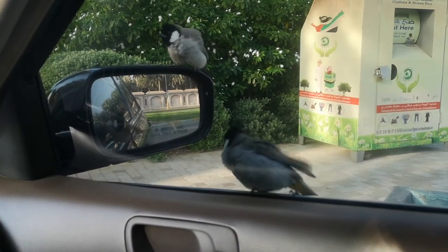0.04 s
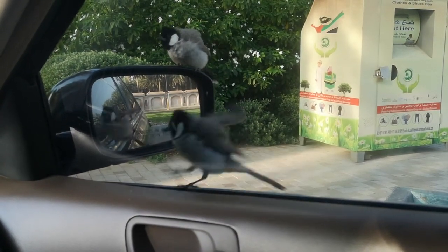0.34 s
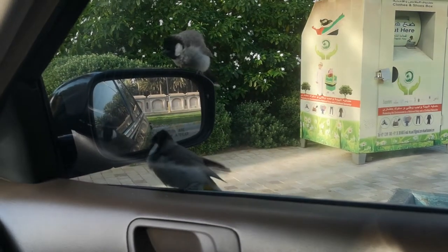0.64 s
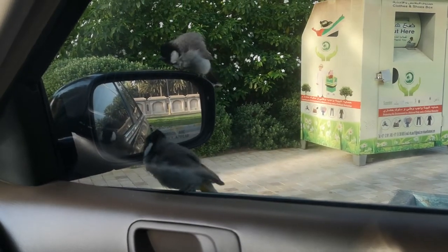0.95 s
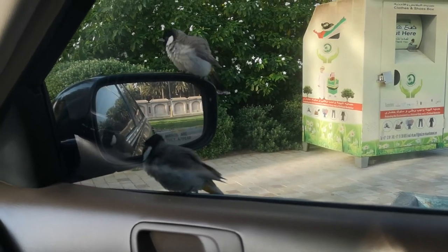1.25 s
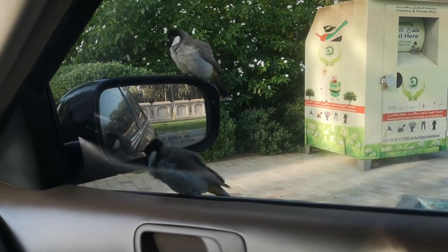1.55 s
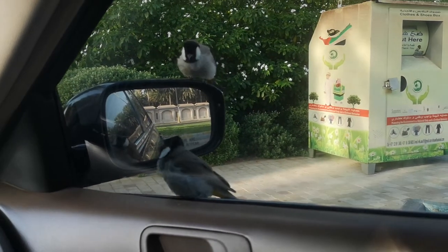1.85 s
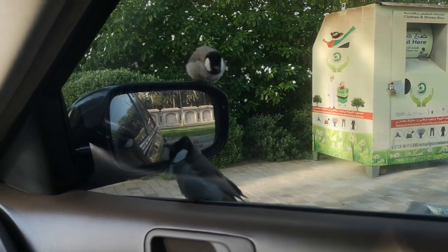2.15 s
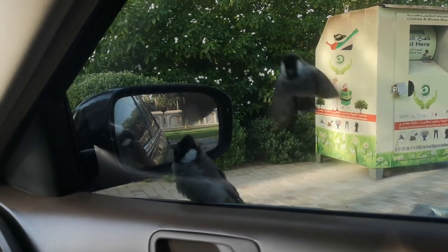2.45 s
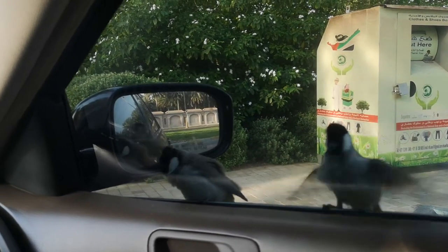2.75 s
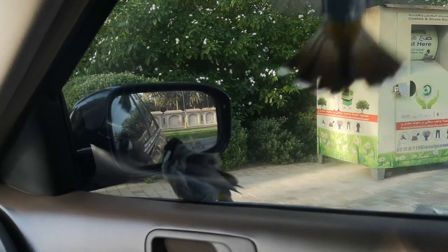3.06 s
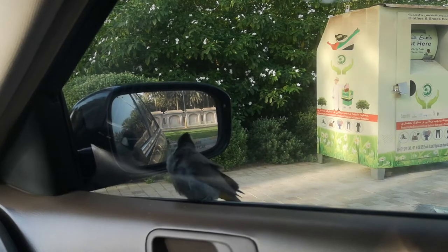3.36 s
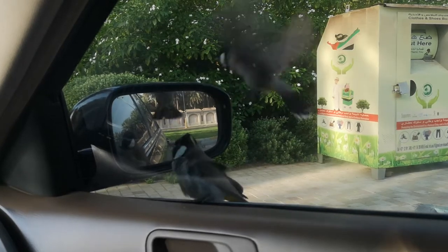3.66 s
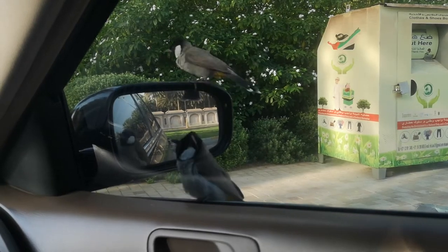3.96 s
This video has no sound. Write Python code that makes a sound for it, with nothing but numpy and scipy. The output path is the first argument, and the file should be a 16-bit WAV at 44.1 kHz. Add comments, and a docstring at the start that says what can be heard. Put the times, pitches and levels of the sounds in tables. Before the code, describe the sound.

A bird knocks sharply on a closed car window at about 2.9 seconds, heard from inside. Before that, small birds chirp faintly outside, with light scuffs on the glass around 0.5 seconds. The knock thuds in the door and is followed by quick claw scratches, smaller taps and soft bumps until about 3.2 seconds. A quiet, low engine hum and traffic rumble run underneath to the end at 4 seconds.

```python
"""Bird at the car window

Inside a parked car, two small birds chatter just beyond the closed side window; others whistle far off.
One flies at the pane, knocks, scrabbles with its claws and brushes it once more. Each hard blow ticks,
rings the glass, thuds in the door and booms in the cabin. An engine hums and traffic rumbles beneath."""
import sys
import numpy as np
from scipy import signal
from scipy.fft import rfft, irfft
from scipy.io import wavfile

SR = 44100
rng = np.random.default_rng(int(sys.argv[2]) if len(sys.argv) > 2 else 0)


def int16_out(signal):
    """Quantize to a 16-bit WAV file."""
    q = np.round(np.clip(np.atleast_2d(signal).T, -1, 1) * 32767)
    wavfile.write(sys.argv[1], SR, q.astype(np.int16))


N = 176400
TIME = np.arange(N) / SR
CUTOFF_HZ = 15900


def amp(db):
    """Decibels to gain."""
    return 10 ** (np.asarray(db) / 20)


def curve(rows):
    """An automation line through (t/s, value) points."""
    return np.interp(TIME, *np.transpose(rows))


def at_hz(rows, hz):
    """Read a table's columns along a log frequency axis."""
    f, *columns = np.transpose(rows)
    return [np.interp(np.log(hz), np.log(f), c) for c in columns]


def add(out, s, x):
    """Mix a sound in at s seconds."""
    i = max(int(s * SR), 0)
    out[..., i:i + x.shape[-1]] += x[..., :N - i]


def band_noise(low, high, size):
    """Two unrelated noises in one band, rms 1."""
    sos = signal.butter(2, [low, high], "band", fs=SR, output="sos")
    noise = signal.sosfilt(sos, rng.standard_normal((2, size + SR // 10)))[:, -size:]
    return noise / np.sqrt(np.mean(noise ** 2) + 1e-20)


def noise_bed(levels, hz, width_hz):
    """A stereo band of noise riding a level curve."""
    return amp(curve(levels)) * band_noise(hz - width_hz / 2, hz + width_hz / 2, N)


def ring(drive, hz, db, t60):
    """One resonant mode, rung by the drive signal."""
    r, w = amp(-60 / (t60 * SR)), 2 * np.pi * hz / SR
    return amp(db) * signal.lfilter([0, np.sin(w)], [1, -2 * r * np.cos(w), r * r], drive + 1e-18)


def ring_modes(drive, modes):
    """A bank of modes in alternating polarity."""
    return sum((-1) ** k * ring(drive, *mode) for k, mode in enumerate(modes))


def decay(t, t60):
    """Exponential fade, 60 dB down at t60."""
    return np.exp(-np.log(1000) * t / t60)


def note(pitch, colour, attack_s, release_s, harmonics, side_db=0, bite_db=0):
    """A bird's note: side_db trims all harmonics but the second, bite_db lifts those above it."""
    t, phase = TIME[:len(pitch)], 2 * np.pi * np.cumsum(pitch) / SR
    tone = 0
    for k in range(1, harmonics + 1):
        db = at_hz(colour, k * pitch)[0] + side_db * (k != 2) + bite_db * (k > 2)
        tone += amp(db) * np.sin(k * phase)
    return np.sqrt(2) * tone * np.minimum(t / attack_s, 1) * np.minimum((t[-1] - t) / release_s, 1)


# Outdoor bed: f/Hz, level/dB in a 1 kHz band, left-right correlation
AMBIENCE = [(25.7, -48.5, 1), (47.2, -38, 0.99), (80, -55.5, 1), (120, -58.5, 0.93), (170, -62.5, 0.87),
            (270, -74.5, 0.29), (455, -77.5, -0.5), (840, -80, -0.28), (1380, -78.5, 0.3),
            (2570, -79.5, -0.34), (4150, -86, -0.18), (6930, -88.5, -0.24), (11350, -99, 0.53),
            (15400, -99, 0.03)]

def ambience():
    """Steady muffled rumble in the centre, with a faint, wide hiss."""
    hz = np.maximum(np.fft.rfftfreq(N, 1 / SR), 1)
    db, alike = at_hz(AMBIENCE, hz)
    mid, side = rfft(rng.standard_normal((2, N))) * amp(db) * np.sqrt(SR / 4000) * (hz > 12)
    return irfft(np.sqrt(1 + alike) * mid + np.sqrt(1 - alike) * side * [[1], [-1]], N)


# Faders of the low drone and the rumble above it: t/s, level/dB
DRONE_LEVEL = [(0, -64.5), (1.15, -60), (2.2, -65.5), (3.7, -59)]
RUMBLE_LEVEL = [(0, -70), (.45, -70.5), (.9, -75.5), (1.5, -83.5), (3.5, -83.5), (4, -71)]

def traffic():
    """Traffic as a rough drone and a higher rumble, both mono."""
    drone = noise_bed(DRONE_LEVEL, hz=79, width_hz=21.5)[0]
    rumble = noise_bed(RUMBLE_LEVEL, hz=164.7, width_hz=57)[0]
    return drone + rumble


# Engine firing rate: t/s, f/Hz
FIRING_RATE = [(0, 87.6), (1, 93), (1.6, 72.1), (2.2, 54), (2.47, 49.38), (2.72, 56.02), (4, 58.2)]
# Engine fader: t/s, level/dB
ENGINE_LEVEL = [(0, -66.5), (.3, -58), (.7, -63), (1.15, -54.5), (1.6, -59.5), (2.08, -59.5), (2.2, -46.5),
                (2.38, -48.5), (2.58, -52.5), (2.86, -52), (3.0, -43.5), (3.11, -42.5), (3.2, -51.5),
                (3.32, -57), (3.38, -45.5), (3.66, -44.5), (3.82, -57.5), (4, -49)]

def engine(octave_db=-21.5):
    """An engine eases off and settles: its hum drops in pitch and swells unevenly."""
    phase = 2 * np.pi * np.cumsum(curve(FIRING_RATE)) / SR
    tone = np.sqrt(2) * (np.sin(phase) + amp(octave_db) * np.sin(2 * phase))
    return amp(curve(ENGINE_LEVEL)) * tone


def whine(hz=590, db=-87.5, peak_s=2.39, swell_s=.21):
    """A thin whine comes and goes."""
    swell = np.exp(-((TIME - peak_s) / swell_s) ** 2)
    return amp(db) * swell * np.sqrt(2) * np.sin(2 * np.pi * hz * TIME)


# Fader of the distant chatter: t/s, level/dB
CHATTER_LEVEL = [(0, -77), (.4, -78), (.62, -72.5), (.9, -77), (1.3, -92), (2.4, -78), (4, -81)]
CHATTER_HZ, CHATTER_WIDTH_HZ = 2355, 1440

def far_chatter():
    """Distant birds blur into a wide wash of noise."""
    return noise_bed(CHATTER_LEVEL, CHATTER_HZ, CHATTER_WIDTH_HZ)


def far_pips(per_s=12, db=-86, length_s=.035, max_glide=.12):
    """Faint gliding bird pips, scattered across the chatter's band."""
    out, u = np.zeros(N), np.linspace(-.5, .5, int(length_s * SR))
    envelope = amp(db) * np.sqrt(2) * np.cos(np.pi * u)
    for when, height, slope in rng.random((int(per_s * N / SR), 3)):
        hz = CHATTER_HZ + CHATTER_WIDTH_HZ * (height - .5)
        pitch = hz * (1 + max_glide * (2 * slope - 1) * u)
        add(out, when * N / SR, envelope * np.sin(2 * np.pi * np.cumsum(pitch) / SR))
    return out


# Whistle cues: t/s, length/s, f/Hz, level/dB, glide/share of f, fundamental trim/dB
WHISTLES = [(0.413, 0.034, 1303, -72, 0.043, 3.5), (0.545, 0.067, 1254, -75.5, -0.16, -10),
            (1.805, .037, 1277, -76.5, -0.04, -1.5), (1.884, 0.034, 1344, -77.5, -0.1, 1.5),
            (2.169, 0.039, 1287, -77, 0.015, 0.5), (3.853, 0.037, 1215, -74, 0.12, -6)]
# Whistle EQ: f/Hz, gain/dB
WHISTLE_EQ = [(1250, 2), (2600, 2.5)]

def far_whistles():
    """Birds further off whistle short glides, each a fundamental and its octave."""
    out = np.zeros(N)
    for s, length, hz, db, glide, trim_db in WHISTLES:
        pitch = hz * (1 + glide * np.linspace(-.5, .5, int(length * SR)))
        whistle = note(pitch, WHISTLE_EQ, attack_s=.019, release_s=.02, harmonics=2, side_db=trim_db)
        add(out, s, amp(db) * whistle)
    return out


# Chirp cues: t/s, length/s, top f/Hz, level/dB, rise/share of f, fall/share of f, rasp/0-1
CHIRPS = [(0.06, 0.017, 1880, -74.5, 0.22, 0.052, 0.3), (0.229, 0.012, 1623, -67.5, 0.058, 0.087, 0.8),
          (0.301, 0.019, 1766, -74.5, 0.26, .03, 0.5), (0.509, 0.016, 1734, -73.5, 0.1, .05, 1),
          (0.605, 0.018, 1870, -61.5, 0.066, 0.024, 0.74), (0.67, 0.042, 2004, -66, 0.14, 0.23, 0.4),
          (0.773, 0.016, 1837, -73, 0.143, .03, 0.72), (0.873, 0.017, 1930, -64, 0.022, .03, 0.8),
          (0.94, 0.042, 2110, -66.5, 0.2, 0.29, 0.3), (1.06, 0.021, 1713, -73.5, 0.059, 0.11, 0.92),
          (1.16, 0.02, 1867, -66, 0.074, 0.039, 1), (1.236, 0.042, 2099, -68, 0.18, 0.28, 0.4),
          (1.575, 0.016, 1590, -73.5, 0.047, .08, 0.72), (1.675, 0.02, 1808, -67, 0.042, 0.037, 1),
          (1.758, 0.048, 2108, -69, 0.21, 0.27, 0.25), (2.363, 0.016, 1780, -60, 0.016, 0.047, 0.53),
          (2.382, 0.033, 2010, -57, 0.286, 0.1525, 0.06), (2.472, 0.019, 1747, -64, 0.091, 0.047, 0.4),
          (2.604, 0.02, 1763, -68, 0.057, .05, 0.9), (2.626, 0.032, 2030, -60.5, 0.34, 0.21, 0.09),
          (2.71, 0.03, 1720, -67.5, 0.2, 0.043, 0.6), (2.849, 0.027, 1845, -69.5, 0.026, .05, .7),
          (2.872, 0.028, 1897, -62, 0.17, 0.15, 0.55), (2.96, 0.023, 1730, -57, 0.034, 0.064, 0.95)]
# Delivery, reedy and even at first, at last purer, quicker and leaning on each note's end:
# t/s, side harmonics/dB, swell/dB per s, time stretch of the arch
DELIVERY = [(.3, -3, -6, 0.96), (1.2, 0, -65, 1), (1.8, -1, -57, 0.91), (2.35, -7, 174, .66)]
# EQ of the calls behind the glass: f/Hz, gain/dB
CHIRP_EQ = [(1600, -9), (2050, -7.5), (3300, 0.5), (3650, -1.5), (4200, -5), (5000, -17.5), (5600, -12),
            (6300, -15), (7200, -30.5), (8400, -19)]
# Cabin resonances that trail each call: f/Hz, level/dB, t60/s
CALL_RINGS = [(3062, -46.5, 0.081), (3750, -51, 0.15), (4140, -45, .1), (5046, -41.5, 0.089),
              (6690, -42.5, 0.12)]
ARCH_TOP_S, ARCH_RISE_S, ARCH_FALL_S = .017, .013, .009   # before the stretch
RASP_HZ, RASP_PITCH_DEPTH, RASP_LEVEL_DEPTH, RASP_BITE_DB = 360, .11, .45, 5

def near_birds():
    """Close chirps arch in pitch; rasp shakes and brightens them, and the cabin rings on."""
    out = np.zeros(N)
    shake, flutter = band_noise(RASP_HZ / 2, RASP_HZ * 2, N)
    when, *manner = np.transpose(DELIVERY)
    for s, length, hz, db, rise, fall, rasp in CHIRPS:
        side_db, swell_db, stretch = (np.interp(s, when, m) for m in manner)
        t = TIME[:int(length * SR)] - ARCH_TOP_S * stretch   # zero at the top of the arch
        here = int(s * SR) + np.arange(len(t))
        slope_s = stretch * np.where(t < 0, ARCH_RISE_S, ARCH_FALL_S)
        sag = np.where(t < 0, rise, fall) * (1 - np.exp(-(t / slope_s) ** 2))
        pitch = hz * np.maximum(1 - sag + RASP_PITCH_DEPTH * rasp * shake[here], .5)
        gain = amp(db + swell_db * t) * (1 + RASP_LEVEL_DEPTH * rasp * flutter[here])
        chirp = note(pitch, CHIRP_EQ, attack_s=.005, release_s=.006, harmonics=4,
                     side_db=side_db, bite_db=RASP_BITE_DB * rasp ** 2)
        add(out, s, gain * chirp)
    return out + ring_modes(out, CALL_RINGS)


def cabin(x, t60=.075, wet_db=-3):
    """Direct sound plus the short, dense reverb of an upholstered cabin."""
    t = TIME[:SR // 5]
    echo = rng.standard_normal((2, len(t))) * decay(t, t60)
    echo /= np.sqrt(np.sum(echo ** 2, axis=1, keepdims=True))
    return x + amp(wet_db) * signal.fftconvolve(x[None], echo, axes=1)[:, :N]


# Soft body hits: t/s, f/Hz, level/dB, t60/s
BUMPS = [(3.027, 128, -41, .08), (3.135, 238.5, -41, 0.1), (3.165, 123, -36.5, .07)]

def bumps():
    """Wings and breast meet the pane with a dull thud and no tick."""
    out, t = np.zeros(N), TIME[:SR // 4]
    for s, hz, db, t60 in BUMPS:
        add(out, s, amp(db) * np.sin(2 * np.pi * hz * t) * decay(t, t60))
    return out


# Dense tail of pane and cabin: f/Hz, level/dB in a 1 kHz band, t60/s, left minus right/dB
TICK_TAIL = [(200, -36, 0.16, 7), (490, -40, 0.081, -4.5), (990, -34.5, 0.06, -1), (1410, -49, 0.088, -0.5),
             (1930, -36, 0.087, -1), (2300, -41, 0.084, 0.5), (4800, -42, 0.059, -5), (6400, -50, 0.071, 2),
             (8490, -42, 0.043, -10.5), (12000, -66, 0.032, -12), (15600, -63, 0.042, -2)]
CRACK_DB, CRACK_S, CRACK_CORNER_HZ = 10, .00067, 15000
CENTRED_BELOW_HZ = 670

def tick(tilt_db):
    """A hard point touches the pane: a bright crack, then a dense ring that dies band by band."""
    t, out = TIME[:SR // 5], 0
    edges = np.geomspace(140, CUTOFF_HZ, 23)
    for low, high in zip(edges, edges[1:]):
        hz, width_khz = np.sqrt(low * high), (high - low) / 1000
        db, t60, pan_db = at_hz(TICK_TAIL, hz)
        stereo_db = db + tilt_db * np.log2(hz / 5000) + pan_db * np.array([[.5], [-.5]])
        crack = amp(CRACK_DB) * np.exp(-t / CRACK_S) / (1 + (CRACK_CORNER_HZ / hz) ** 2)
        mid, side = band_noise(low, high, len(t))
        alike = 1 / (1 + (hz / CENTRED_BELOW_HZ) ** 2)
        noise = np.sqrt((1 + alike) / 2) * mid + np.sqrt((1 - alike) / 2) * side * [[1], [-1]]
        out += np.sqrt(width_khz) * amp(stereo_db) * noise * (decay(t, t60) + crack)
    return out


# Scuff cues: t/s, length/s, level/dB, tilt/dB per octave
SCUFFS = [(0.4, 0.0073, -37.5, 2.5), (0.478, 0.018, -36, 1.5), (0.526, 0.023, -31, 3.5),
          (2.26, 0.015, -37, -2), (2.878, 0.033, -24.5, 0.5), (2.989, 0.036, -19, 1.5),
          (3.106, 0.031, -25.5, -1), (3.133, 0.046, -12, -0.5), (3.796, 0.021, -37.5, -3.5)]

def scuffs(grains_per_s=390, fade_db=13):
    """Claws and feathers rub the glass in fading runs of tiny, uneven ticks."""
    out = np.zeros((2, N))
    for s, length, db, tilt_db in SCUFFS:
        u = np.linspace(0, 1, int(length * SR))
        chance, size = rng.random(SR // 10)[:len(u)], rng.standard_normal(SR // 10)[:len(u)]
        catches = (chance < grains_per_s / SR) | (u == 0)
        grains = size * catches * amp(-fade_db * u)
        grains /= np.linalg.norm(grains)
        add(out, s, amp(db) * signal.fftconvolve(grains[None], tick(tilt_db), axes=1))
    return out


# Hard hits: t/s, tick/dB, tick tilt/dB per octave, glass ring/dB, door thud/dB, cabin boom/dB
BLOWS = [(2.864, -18.5, 5, -48, -30, -16), (2.9055, 3.5, 3, 1.5, 4.5, -9), (2.9103, -10, -4, -15, -13, -31),
         (2.9696, -18.5, 2.5, -50, -16, -38), (2.976, -25, -2, -49, -17, -0.5),
         (2.9858, -15, 10.5, -31.5, -14.5, -11), (3.001, -27, 10, -49, -27, -30),
         (3.1231, -16.5, 7, -36, -43, -14), (3.1337, -13, 2.5, -24, -12, -30),
         (3.192, -28, 0.5, -57, -33.5, -38)]
# Pane modes: f/Hz, level/dB, t60/s, right gain against left (negative flips polarity)
GLASS_MODES = [(309.2, -30, 0.14, 0.42), (400, -45, .1, -1.1), (552, -40, 0.11, -1.4),
               (611, -43, 0.12, 0.88), (715, -37.5, 0.13, -0.94), (807, -39, 0.12, 0.19),
               (917, -27, 0.059, 0.25), (996, -36, 0.089, -0.17), (1108, -29, 0.017, 0.87),
               (2480, -52, 0.12, 0.81), (2740, -47, 0.085, 0.86), (3920, -39.5, 0.037, 0.82),
               (5064, -34.5, 0.03, 1)]
# Door modes: f/Hz, level/dB, t60/s
DOOR_MODES = [(160.7, -24.5, 0.059), (100.3, -27, 0.18), (200, -34.5, 0.038)]
SOFT_CONTACT_HZ = 553

def knocks():
    """Each blow of the bird ticks, rings the glass, thuds in the door and sets the cabin air booming."""
    ticks = np.zeros((2, N))
    glass_hits, door_hits, air_hits = np.zeros((3, N))
    for s, tick_db, tilt_db, glass_db, door_db, boom_db in BLOWS:
        add(ticks, s, amp(tick_db) * tick(tilt_db))
        i = int(s * SR)
        glass_hits[i], door_hits[i], air_hits[i] = amp([glass_db, door_db, boom_db])
    thud = ring_modes(door_hits, DOOR_MODES)
    boom = ring(air_hits, hz=54, db=-28, t60=.18)
    low_end = signal.sosfilt(signal.butter(2, SOFT_CONTACT_HZ, fs=SR, output="sos"), thud + boom)
    pane = sum((-1) ** k * ring(glass_hits, *mode) * np.array([[1], [right]])
               for k, (*mode, right) in enumerate(GLASS_MODES))
    return ticks + low_end + pane


def scene():
    """The mix from the seat: bird calls, hits on the window and the bed beneath."""
    calls = cabin(near_birds() + far_whistles() + far_pips())
    window = knocks() + bumps() + scuffs()
    bed = engine() + whine() + traffic() + ambience() + far_chatter()
    return calls + window + bed


def record(dry):
    """A steep low-pass takes off the very top."""
    return signal.sosfilt(signal.ellip(10, .1, 80, CUTOFF_HZ, fs=SR, output="sos"), dry)


dry = scene()
out = record(dry)
int16_out(out)
```